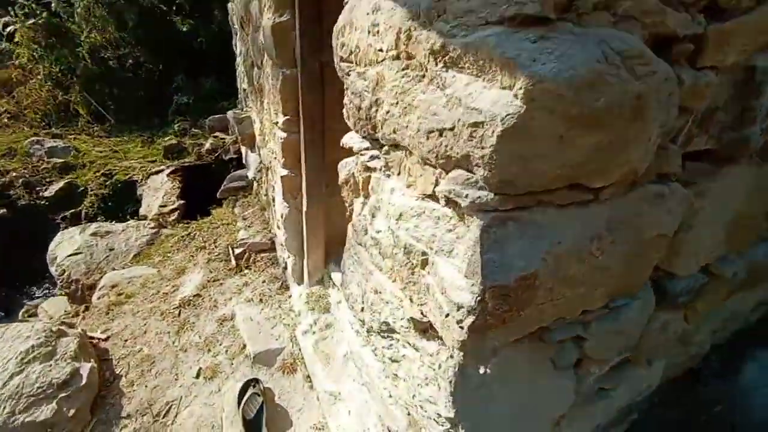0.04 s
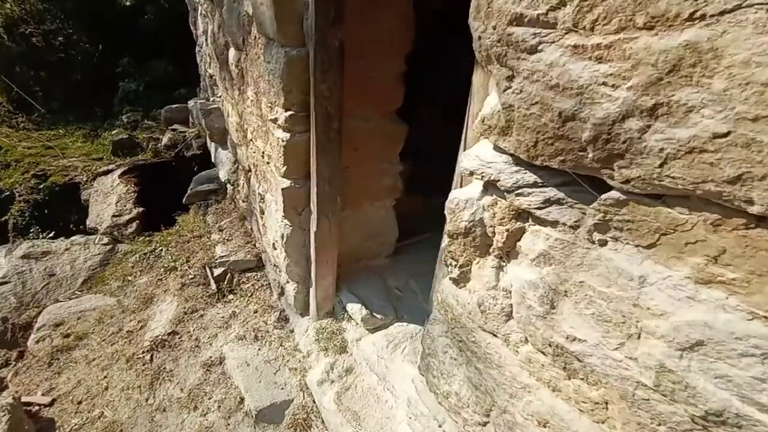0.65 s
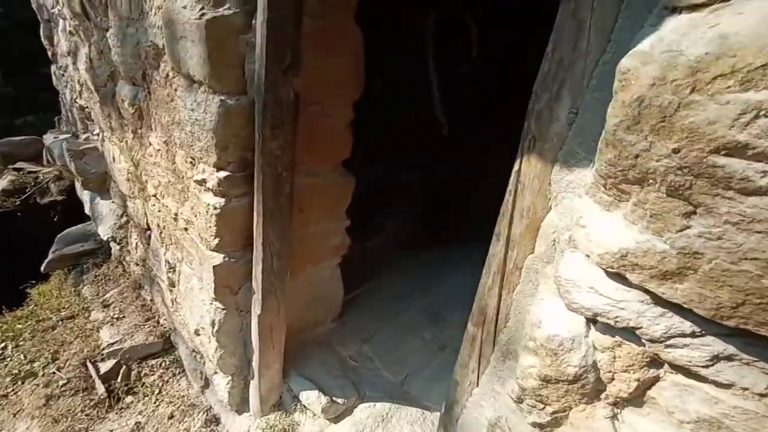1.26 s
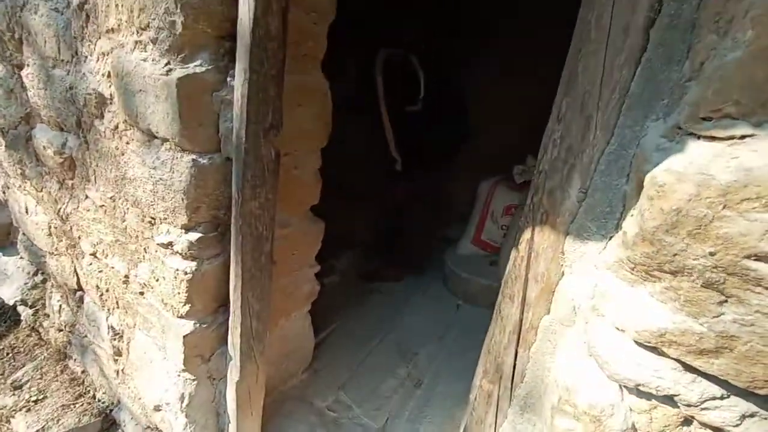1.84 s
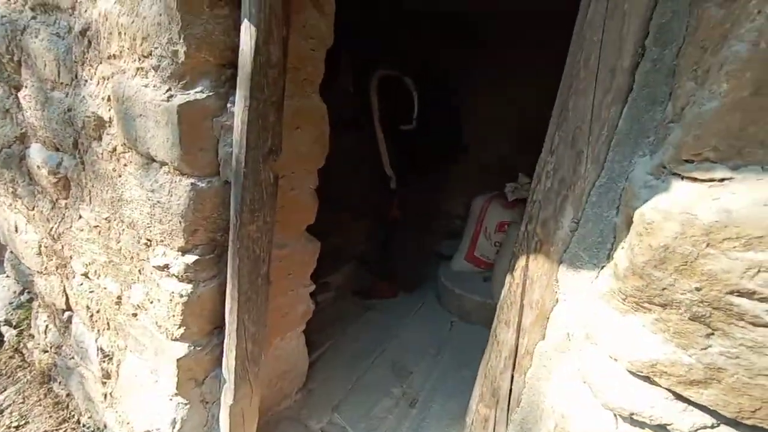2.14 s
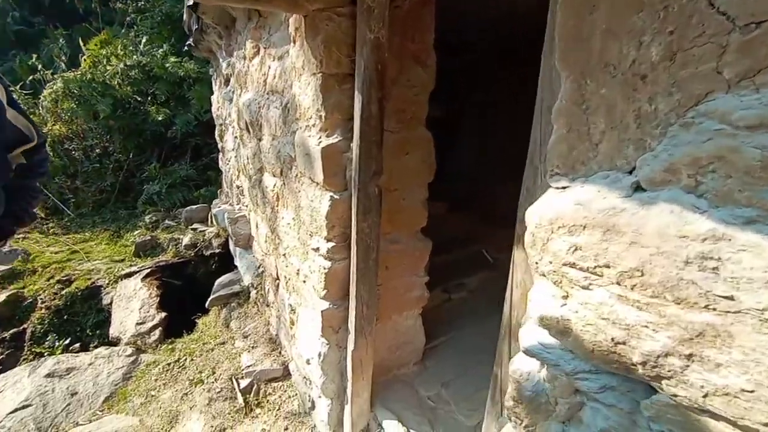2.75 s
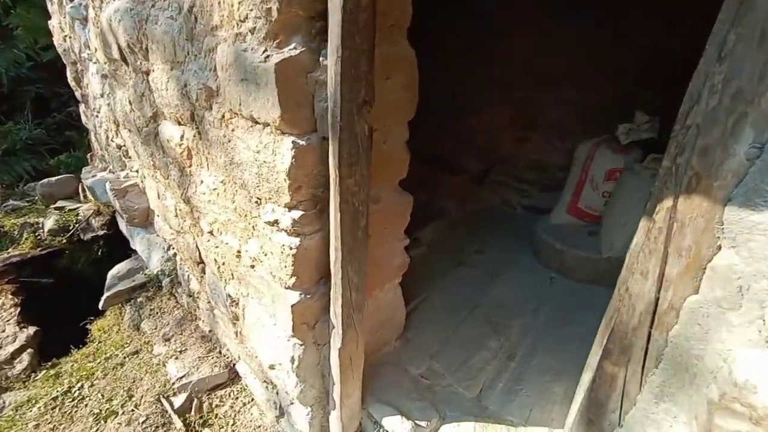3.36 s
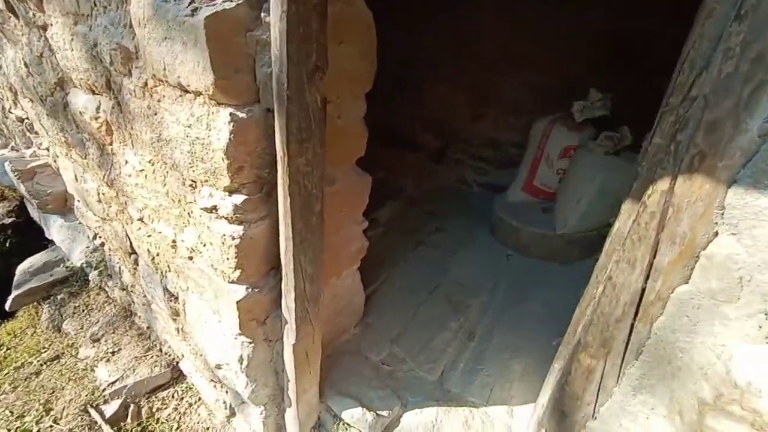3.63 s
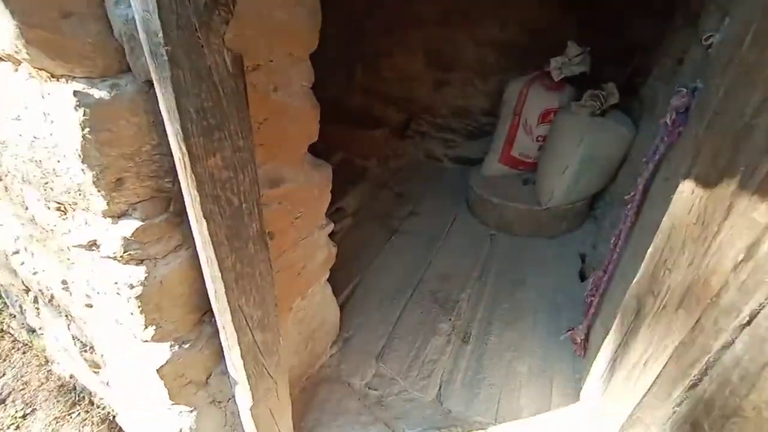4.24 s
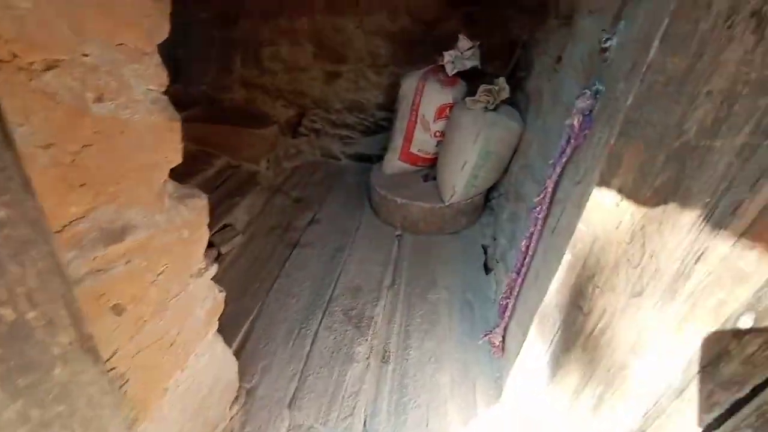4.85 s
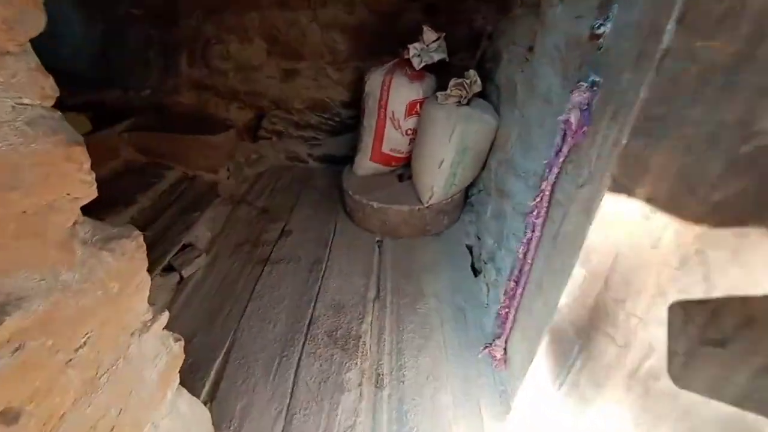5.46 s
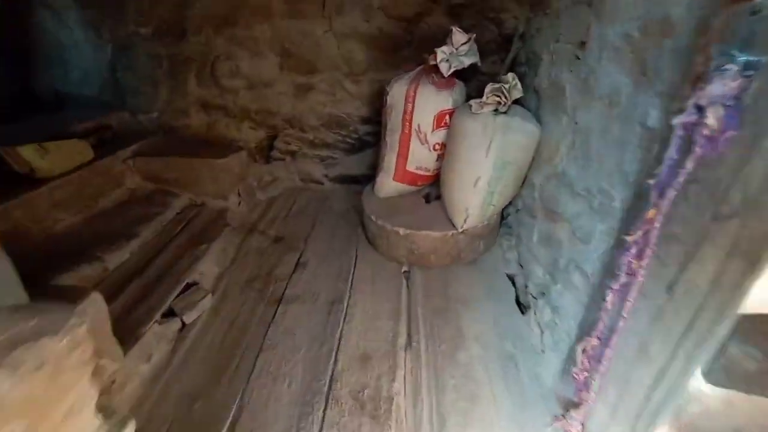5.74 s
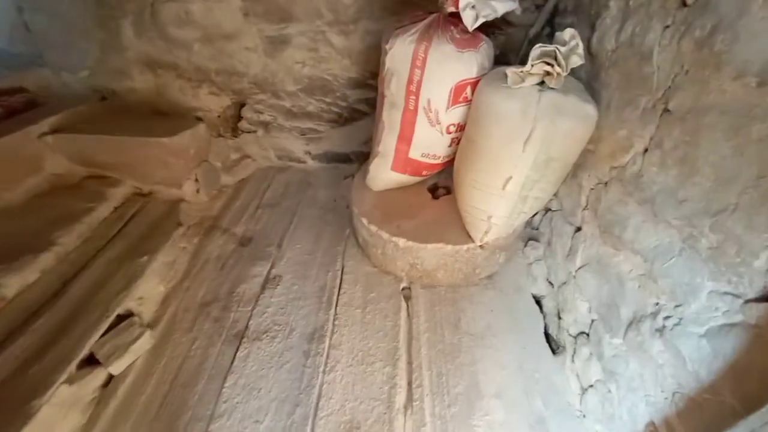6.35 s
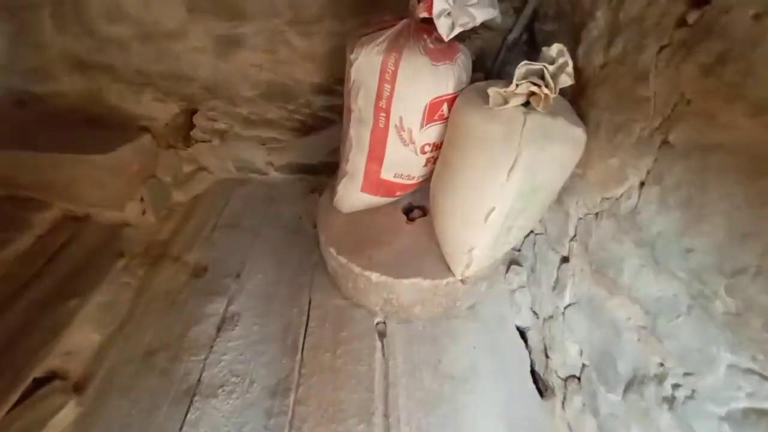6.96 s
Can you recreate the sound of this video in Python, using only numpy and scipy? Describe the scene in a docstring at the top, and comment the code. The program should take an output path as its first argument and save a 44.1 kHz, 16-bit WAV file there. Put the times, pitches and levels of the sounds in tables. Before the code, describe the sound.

Water rushes and churns outside a stone hut from the start, with a faint puff of wind on the microphone. From about 0.4 seconds, wooden sticks chatter on a turning millstone in rapid, uneven knocks and short skids, shaking a wooden grain feeder that adds a hollow note. Underneath, the stone grinds with a low groan about twice a second. Between roughly 2.2 and 3.2 seconds, gusts buffet the microphone with bassy thumps. As the microphone nears the doorway, from about 3.5 seconds, the clatter becomes louder and denser and the grinding heavier. Around 5.4 seconds the water's hiss drops away behind the wall, and sharp wooden cracks stand out, the loudest near 5.6 seconds. Until the end at about 7 seconds, close rattling, small high ticks and the stone's rumble fill the hut with a short echo, the water now faint.

```python
"""Wooden clapper sticks chatter on a turning millstone, which grinds heavily about twice a second.
This is a water-driven grain mill in a stone hut, heard on a walk from the yard in through its door.
The sticks hit, skid and jolt a hollow grain feeder; crushed grain makes the stones groan.
The mill race rushes outside and fades behind the wall; gusts buffet the microphone on the way."""
import sys
import numpy as np
from scipy import signal
from scipy.fft import rfft, irfft, next_fast_len
from scipy.io import wavfile
from scipy.ndimage import uniform_filter1d, minimum_filter1d, map_coordinates

SR = 44100
rng = np.random.default_rng(int(sys.argv[2]) if len(sys.argv) > 2 else 0)


def materialize(psi):
    """Save the field psi as 16-bit PCM at rate SR to the path in sys.argv[1].

    A 1-D psi becomes a single channel; in a 2-D psi each row is a channel.
    """
    bounded = np.clip(np.atleast_2d(psi).T, -1, 1)
    quanta = np.round(bounded * 32767).astype(np.int16)
    wavfile.write(sys.argv[1], SR, quanta)


N = 308700
TIME = np.arange(N) / SR
AGE = np.arange(SR // 7) / SR  # seconds into one contact

# the loudest stick landings: start_s, level_db, pitch_hz, ring_share (0-1), contact_s (long = a skid)
LOUD_KNOCKS = [(0.416, -17, 3030, 0.65, 0.0032), (0.435, -20.5, 2960, 0.47, .0035),
               (0.846, -20.5, 3000, 0.089, 0.016), (0.942, -13.5, 2570, .15, 0.0032),
               (0.978, -14.5, 3044, 0.59, 0.004), (1.215, -19.5, 2715, .3, 0.013),
               (1.338, -11, 2320, .9, 0.0016), (1.362, -9.5, 2565, 0.33, 0.0058),
               (1.463, -17.5, 1713, 0.19, 0.024), (1.771, -17, 2740, 0.25, 0.019),
               (1.923, -17.5, 1650, .1, .014), (1.993, -16.5, 2600, 0.25, 0.0064),
               (2.09, -20.5, 1940, 0.85, 0.0044), (2.158, -20.5, 2500, .2, .026),
               (2.354, -19, 2050, 0.44, .007), (2.672, -19, 2070, .4, 0.024),
               (2.868, -18.5, 2120, 0.97, 0.012), (2.949, -23, 2990, 0.48, .03),
               (3.136, -17, 2420, 0.17, 0.009), (3.217, -15.5, 2540, 0.52, 0.0055),
               (3.244, -20.5, 2620, 0.046, 0.017), (3.544, -14.5, 2020, .1, 0.022),
               (3.665, -9.5, 2360, 0.64, 0.0052), (3.699, -17, 1940, .7, .005),
               (3.763, -13.5, 1907, 0.55, 0.006), (3.859, -14, 1890, 0.17, 0.0066),
               (4.154, -12.5, 2120, 0.47, 0.021), (4.273, -13.5, 2990, 0.66, 0.015),
               (4.325, -13.5, 2118, 0.75, 0.014), (4.377, -16, 2630, 0.52, 0.0035),
               (4.477, -17, 1924, 0.31, .006), (4.516, -17, 2310, 0.85, .011),
               (4.588, -18, 3030, .7, 0.0082), (4.619, -12.5, 1910, 0.78, .0045),
               (4.639, -11.5, 2094, 0.69, 0.0094), (4.699, -14.5, 2970, 0.65, 0.011),
               (4.842, -16, 2086, 0.51, 0.019), (4.904, -17.5, 2970, 0.6, 0.017),
               (5.117, -16.5, 2710, 0.09, 0.047), (5.188, -18, 2580, 0.26, 0.027),
               (5.325, -16, 1964, 1, 0.0049), (5.358, -13, 2142, .25, 0.013), (5.43, -17, 3000, 0.31, 0.01),
               (5.567, -16, 2630, 0.63, 0.0092), (5.643, -6.5, 2086, 0.73, 0.014),
               (5.711, -18.5, 1963, 1, .018), (5.807, -12.5, 2044, 0.62, 0.0064),
               (5.883, -15.5, 2184, 0.6, 0.0054), (6.032, -16.5, 2650, 0.27, 0.0094),
               (6.112, -13.5, 2180, 0.09, 0.009), (6.224, -17, 1965, 0.32, 0.0034),
               (6.328, -12, 2130, 0.39, 0.0053), (6.403, -9.5, 2640, .3, 0.0074),
               (6.457, -19.5, 2640, 0.099, 0.018), (6.626, -13, 2710, 0.26, 0.019),
               (6.73, -18.5, 1922, 1, 0.024), (6.819, -8.5, 2070, 0.73, 0.011),
               (6.865, -14.5, 1936, 0.64, 0.013)]
# wood landing hard on stone: start_s, level_db
HARD_LANDINGS = [(5.358, -23), (5.640, -24), (5.864, -30.5), (6.028, -35.5), (6.109, -31.5), (6.219, -38),
                 (6.322, -33.5), (6.462, -35), (6.567, -33), (6.82, -29)]
# resonances of the sticks: pitch_hz, width_hz, level_db
STICK_MODES = [(1725, 24, -3.5), (1934, 38, 4.5), (2127, 48, 1.5), (2360, 260, -5), (2673, 144, 1),
               (2992, 68, -0.5), (3224, 97, -9.5), (4247, 96, -10), (4580, 98, -12)]
# the sticks' light rattle, louder toward the door and inside: time_s, level_db
RATTLE_LEVEL = [(0, -54), (.7, -35), (2.3, -31), (3.4, -27), (4.3, -26.5), (5, -26), (5.6, -19.5), (7, -26)]
# the walk through the door: time_s, inside (0 = yard, 1 = hut)
WALK = [(0, 0), (2.8, 0.32), (4.5, 0.71), (5.6, 0.76), (7, 0.71)]


def clapper(landings, tap_count=300):
    """The sticks scrape and tap along the stone, lifting briefly before each hit or skid."""
    # wood dragging on stone: frequency_hz, level_db
    scrape_eq = [(200, -32.5), (600, -13), (1000, -2.5), (1500, -4), (2600, -3.5), (3500, -7.5),
                 (4500, -20), (6000, -29), (16000, -47.5)]
    # a wooden contact is too soft to excite much treble: frequency_hz, level_db
    softness_eq = [(400, -1), (900, 1.5), (3400, 2.5), (4400, 1), (5300, -18), (7000, -20), (12000, -33)]
    body = resonate(grit(spread_db=3), STICK_MODES)
    scrape = amp(-4.5) * coloured(grit(spread_db=3), scrape_eq)
    wood = coloured(body + scrape, softness_eq)
    rattle_db, = curves(RATTLE_LEVEL)
    out = amp(rattle_db - 3.8 + 2.4 * wobble(45)) * wood
    for i, (when, which, lightness) in enumerate(rng.random((tap_count, 3))):
        at = int((i + when) / tap_count * N)
        tap = knock(wood, favoured_pitch(which), ring_share=0.82, contact_s=0.0041)
        add(out, at / SR, amp(rattle_db[at] + 2.5 - 4.1 * lightness) * tap)
    out *= lift_off(landings, flight_s=0.026, dip_db=-2.5)
    for start_s, db, hz, ring_share, contact_s in landings:
        add(out, start_s, amp(db + 2.5) * knock(wood, hz, ring_share, contact_s))
    return out


def knock(wood, hz, ring_share, contact_s):
    """One contact of a stick: a burst of wooden chatter and one ringing mode, soon damped."""
    chatter = unit_burst(snippet(wood) * swell(contact_s * 0.19, contact_s * 0.91, decay_s=0.015))
    note = unit_burst(ring(hz, width_hz=16) * swell(contact_s * 0.55, contact_s * 1.05, decay_s=0.008))
    return np.sqrt(1 - ring_share) * chatter + np.sqrt(ring_share) * note


def favoured_pitch(which, below_hz=3100):
    """Soft contacts ring only the lower modes; a draw of 0-1 picks one, strong modes more often."""
    hz, _, db = np.transpose(STICK_MODES)
    odds = np.cumsum(amp(db) * (hz < below_hz))
    return hz[np.searchsorted(odds, which * odds[-1])]


def bounces(count=150, per_s=15.5, typical_contact_s=0.017, clearance_s=0.04):
    """The sticks' lighter landings at an uneven pace, as rows like those of LOUD_KNOCKS."""
    step, size, length = rng.standard_normal((count, 3)).T
    which, purity = rng.random((count, 2)).T
    start_s = np.cumsum(np.exp(0.3 * step)) / per_s
    rattle_db, = curves(RATTLE_LEVEL)
    db = -21.5 + 0.65 * (np.interp(start_s, TIME, rattle_db) - rattle_db.mean()) + 1.7 * size
    ring_share = 0.06 + 0.79 * purity ** 2
    contact_s = typical_contact_s * np.exp(0.33 * length)
    middle_s = start_s + typical_contact_s / 2
    gap_s = np.abs(middle_s[:, None] - np.array(LOUD_KNOCKS)[:, 0]).min(axis=1)
    db[gap_s < clearance_s] = -np.inf  # no room for a bounce beside a loud knock
    return np.column_stack([start_s, db, favoured_pitch(which), ring_share, contact_s])


def lift_off(landings, flight_s, dip_db):
    """A gain of 1 while the sticks ride the stone, dipping in the short flight before each landing."""
    airborne = np.zeros(N)
    hump = np.hanning(round(flight_s * SR))
    for start_s, *_ in landings:
        add(airborne, start_s - 1.05 * flight_s, hump)
    return amp(dip_db * np.minimum(airborne, 1))


def feeder(landings, full_jolt_contact_s=0.0066):
    """The shaken wooden feeder sings one hollow note, swelling at each jolt; rough skids jolt it most."""
    # how hard the feeder shakes: time_s, level_db
    shake_level = [(0, -34.5), (.3, -28.5), (.9, -24), (1.9, -23), (2.35, -29), (2.9, -26.5), (3.3, -22.5),
                   (3.75, -26), (4.4, -22.5), (5.15, -23.5), (5.5, -18.5), (7, -21)]
    shake_db, = curves(shake_level)
    hollow = resonate(rng.standard_normal(N), [(1303, 54, 3), (1250, 66, 0.5)], order=2)
    out = amp(shake_db - 7.5) * hollow
    jolt = swell(rise_s=0.0078, hold_s=0.019, decay_s=0.013)
    for start_s, db, _, ring_share, contact_s in landings:
        detune, size = rng.standard_normal(2)
        note = ring(1306 + 11 * detune, width_hz=12)
        grip = min(contact_s / full_jolt_contact_s, 1) * (1 - ring_share / 2)
        push = np.isfinite(db) * np.sqrt(grip)  # a muted bounce gives no push
        jolt_db = np.interp(start_s, TIME, shake_db) + 3.5 + 2.3 * size
        add(out, start_s, push * amp(jolt_db) * note * jolt)
    return out


def cracks(light_count=70):
    """Hard landings add a short bright splinter of sound; lighter ones tick in between."""
    # the dry snap of wood on stone: frequency_hz, level_db
    crack_eq = [(500, -7), (2000, 2), (4000, 2), (5500, -4), (7500, -8), (11000, -19), (16000, -25)]
    out = np.zeros(N)
    bright = coloured(rng.standard_normal(N), crack_eq)
    splinter = swell(rise_s=0.001, hold_s=0.003, decay_s=0.015)
    for start_s, db in HARD_LANDINGS:
        add(out, start_s, amp(db + 7.5) * snippet(bright) * splinter)
    for i, (when, lightness) in enumerate(rng.random((light_count, 2))):
        start_s = (i + when) / light_count * N / SR
        add(out, start_s, amp(-36 - 6.1 * lightness) * snippet(bright) * splinter)
    return out


def ticks(count=170, low_hz=4170, high_hz=7400):
    """Small hard parts rattle with a brief high ring that does not carry outside."""
    inside, = curves(WALK)
    out = np.zeros(N)
    tap = swell(rise_s=0.001, hold_s=0.002, decay_s=0.006)
    for i, (when, pitch, lightness) in enumerate(rng.random((count, 3))):
        note = ring(low_hz + pitch * (high_hz - low_hz), width_hz=190)
        add(out, (i + when) / count * N / SR, amp(-33.5 - 13 * lightness) * note * tap)
    return inside * out


def millstone():
    """Grain crushed between the stones makes them groan in shifting modes and shakes the floor."""
    # the stone rubs hard once a turn: start_s, level_db
    hard_rubs = [(.14, -44), (.69, -35.5), (1.18, -35.5), (1.72, -36), (2.44, -38), (2.89, -33.5),
                 (3.37, -32.5), (3.91, -34), (4.36, -30.5), (4.909, -33), (5.36, -32), (5.84, -29),
                 (6.348, -31.5), (6.83, -31.5)]
    # resonances of the stone on its wooden floor: pitch_hz, width_hz, yard_db, hut_db
    stone_modes = [(236.4, 52, -1.5, -14), (415, 54, -3.5, 3), (453.7, 29, -2, -5.5), (885, 80, -4, 1.5),
                   (1036, 110, -0.5, -7.5)]
    # the dull rumble under the grinding: frequency_hz, level_db
    rumble_eq = [(25, -19), (55, -13), (100, 4), (190, -0.5), (300, 1), (600, -1.5), (1000, -10.5),
                 (2000, -32)]
    grind = sum(amp(db) * envelope(start_s, attack_s=0.012, hold_s=0.11, release_s=0.13)
                for start_s, db in hard_rubs)
    grind += amp(-48.5)  # light grinding between the rubs
    inside, = curves(WALK)
    groan = np.zeros(N)
    for hz, width_hz, yard_db, hut_db in stone_modes:
        level_db = yard_db + (hut_db - yard_db) * inside + 2 * wobble(5)
        groan += amp(level_db) * resonate(rng.standard_normal(N), [(hz, width_hz, 0)], order=2)
    floor = amp(-2) * coloured(grit(spread_db=0.5), rumble_eq)
    steady_rub = amp(-31) * resonate(grit(spread_db=4), [(893, 82, 0)], order=2)
    return amp(-3.5 + 2 * wobble(20)) * grind * (groan + floor) + inside ** 3 * steady_rub


def mill_race():
    """Water churns under the hut and rushes down its chute; walls shade the spray more than the rush."""
    # the water along the walk, its spray cut off at the door: time_s, churn_db, spray_db
    water_level = [(0, -46, -47.5), (.8, -41.5, -45), (1.9, -41.5, -44.5), (2.4, -46, -43.5),
                   (3.3, -44, -42), (4, -47.5, -43.5), (4.6, -49, -46), (5.2, -46, -48.5),
                   (5.34, -39.5, -50), (5.45, -43, -58.5), (5.8, -49, -60), (7, -60, -65.5)]
    # low churn, midrange rush and hissing spray, each: frequency_hz, level_db
    churn_eq = [(25, -31), (60, -17), (110, 1.5), (160, 3), (260, -5.5), (500, -15), (1000, -9),
                (3000, -73)]
    rush_eq = [(100, -40), (300, -9.5), (600, -3.5), (1100, 1.5), (1500, -1), (2500, 5), (3500, 5),
               (4400, -24), (5300, -42), (8000, -67)]
    spray_eq = [(500, -37), (2000, -5), (4000, 6.5), (6000, 3), (10000, 0), (16000, 7.5)]
    churn_db, spray_db = curves(water_level)
    churn = amp(churn_db + 2.5 + 0.69 * wobble(12)) * coloured(grit(spread_db=4), churn_eq)
    rush = amp(0.34 * spray_db - 12 + wobble(25)) * coloured(grit(spread_db=1.5), rush_eq)
    spray = amp(spray_db + 17.5 + 0.87 * wobble(14)) * coloured(grit(spread_db=1.5), spray_eq)
    return churn + rush + spray


def wind(lumps_per_s=26, lump_db=1.9):
    """Each gust tumbles eddies over the microphone, low lumps of pressure."""
    # gusts on the microphone: start_s, length_s, level_db
    gusts = [(0.144, .08, -34.5), (.25, 0.055, -31), (2.18, 0.18, -38.5), (2.414, 0.063, -30),
             (2.52, 0.067, -21.5), (2.702, 0.34, -22), (3.077, 0.062, -20), (4.196, 0.33, -40.5)]
    # their bassy buffeting: frequency_hz, level_db
    buffet_eq = [(20, -33), (40, -22), (70, 2), (120, 4.5), (200, -9), (350, -17), (700, -68), (2000, -80)]
    force = sum(amp(db) * envelope(start_s, attack_s=0.031, hold_s=length_s, release_s=0.033)
                for start_s, length_s, db in gusts)
    eddies = coloured(rng.standard_normal(N), buffet_eq)
    running_rms = np.sqrt(np.abs(uniform_filter1d(eddies ** 2, size=1500)) + 1e-9)
    eddies /= running_rms  # evened out, so the wobble sets each lump's strength
    return force * amp(lump_db * wobble(lumps_per_s)) * eddies


def hut_reverb(x, predelay_s=0.006):
    """The short answer of the stone walls, a new tail every quarter second as the listener walks."""
    # the hut's decay time: frequency_hz, t60_s
    decay_times = [(200, 0.72), (2000, 0.18), (10000, 0.028)]
    out, step = np.zeros(N), SR // 4
    hz, age_s, noise = signal.stft(rng.standard_normal((N // step + 1, step)), SR, nperseg=256)
    decay = amp(-60 * age_s / along(decay_times, hz)[:, None])
    _, tails = signal.istft(noise * decay, SR, nperseg=256)
    for start, tail in zip(range(0, N, step), tails):
        wet = signal.fftconvolve(x[start:start + step], tail / np.linalg.norm(tail))
        add(out, start / SR + predelay_s, wet)
    return out


def compressor(x, knee_db, slope, smoothing_s):
    """Loud knocks push the gain down just ahead of them, and the water ducks with it."""
    power = np.abs(uniform_filter1d(x ** 2, size=220))
    target_gain = (1 + (power / amp(knee_db) ** 2) ** 2) ** (-slope / 4)
    held_gain = minimum_filter1d(target_gain, size=1300)  # reaches about 15 ms each way
    pole = np.exp(-1 / (smoothing_s * SR))
    return x * (1 + signal.lfilter([1 - pole], [1, -pole], held_gain - 1))


def amp(db):
    """Decibels to gain."""
    return 10 ** (np.asarray(db) / 20)


def unit(x):
    """x at rms 1."""
    return x / np.sqrt(np.mean(x ** 2) + 1e-20)


def unit_burst(x):
    """x at rms 1 over its loudest 9 ms."""
    return x / np.sqrt(uniform_filter1d(x ** 2, size=400).max() + 1e-20)


def along(points, hz):
    """Rows of frequency_hz, value, read at hz on a log axis."""
    point_hz, values = np.transpose(points)
    return np.interp(np.log(hz + 1), np.log(point_hz), values)


def curves(rows):
    """Automation: one value per sample for each column after time_s."""
    time_s, *columns = np.transpose(rows)
    return [np.interp(TIME, time_s, column) for column in columns]


def wobble(per_s):
    """A smooth random curve with per_s knots a second."""
    coarse_s = TIME[::64]
    knots = rng.standard_normal(int(N * per_s / SR) + 4)
    return np.interp(TIME, coarse_s, map_coordinates(knots, [coarse_s * per_s]))


def filtered(x, response):
    """x through a filter whose gain is response(hz)."""
    size = next_fast_len(len(x) + 8192)
    return irfft(rfft(x, size) * response(np.fft.rfftfreq(size, 1 / SR)), size)[:len(x)]


def coloured(x, eq):
    """x through an EQ curve (frequency_hz, level_db), at rms 1."""
    return unit(filtered(x, lambda hz: amp(along(eq, hz))))


def resonate(x, modes, order=1):
    """x through modes (pitch_hz, width_hz, level_db), at rms 1; a higher order deepens the valleys."""
    grid = np.geomspace(10, SR / 2, num=4096)
    body = sum(amp(db) / (1 + 1j * (grid ** 2 - pitch ** 2) / (grid * width)) ** order
               for pitch, width, db in modes)
    return unit(filtered(x, lambda hz: np.interp(hz, grid, body)))


def grit(spread_db):
    """Noise made of millisecond grains of unequal size."""
    sizes = np.repeat(rng.standard_normal(N // 40 + 1), 40)[:N]
    return rng.standard_normal(N) * amp(spread_db * sizes)


def ring(hz, width_hz):
    """A mode whose phase is nudged by repeated small contacts."""
    drift = np.cumsum(rng.standard_normal(len(AGE))) * np.sqrt(2 * np.pi * width_hz / SR)
    return np.sin(2 * np.pi * hz * AGE + uniform_filter1d(drift, size=90))


def swell(rise_s, hold_s, decay_s, age=AGE):
    """The force of one contact: it builds up, lasts until hold_s, then dies away."""
    return np.clip(age / rise_s, 0, 1) * np.exp(-np.maximum(age - hold_s, 0) / decay_s)


def envelope(start_s, attack_s, hold_s, release_s):
    """A swell placed at start_s on the scene's timeline."""
    return swell(attack_s, hold_s, release_s, age=TIME - start_s)


def snippet(x):
    """A random stretch of x as long as one contact."""
    start = int(rng.random() * (N - len(AGE)))
    return x[start:start + len(AGE)]


def add(track, start_s, sound):
    """Mix a sound in at start_s."""
    part = track[max(round(start_s * SR), 0):][:len(sound)]
    part += sound[:len(part)]


def scene():
    """The clatter and its echo in the hut, over the grinding stone, the water and the wind."""
    landings = np.vstack([LOUD_KNOCKS, bounces()])
    woodwork = clapper(landings) + feeder(landings)
    woodwork *= lift_off(HARD_LANDINGS, flight_s=0.022, dip_db=-8)
    clatter = woodwork + cracks() + ticks()
    return (clatter + amp(-11.5) * hut_reverb(clatter) + millstone() + mill_race() + wind())[None]


def record(dry):
    """The microphone's colour, fast compression and a cut of the highest treble."""
    # the microphone's port favours the presence range and cuts three notches: frequency_hz, level_db
    port_eq = [(1500, -1.5), (2900, 0), (3450, -2.5), (4000, -6.5), (4850, -10.5), (5800, 0.5),
               (7100, -8.5), (8100, -19), (9200, -7.5), (10300, -5.5), (12000, -15), (13800, -28),
               (15000, -26.5)]
    x = filtered(dry[0], lambda hz: amp(along(port_eq, hz)))
    x = amp(1) * compressor(x, knee_db=-18, slope=0.68, smoothing_s=0.0067)
    return filtered(x, lambda hz: hz < 15550)[None]


dry = scene()
out = record(dry)
materialize(out)
```